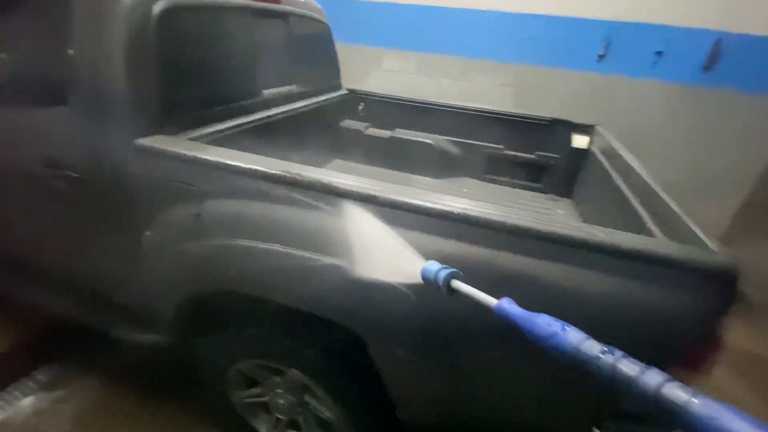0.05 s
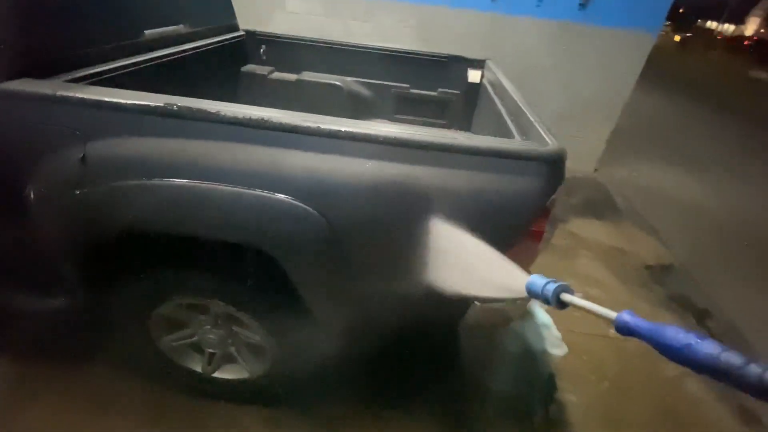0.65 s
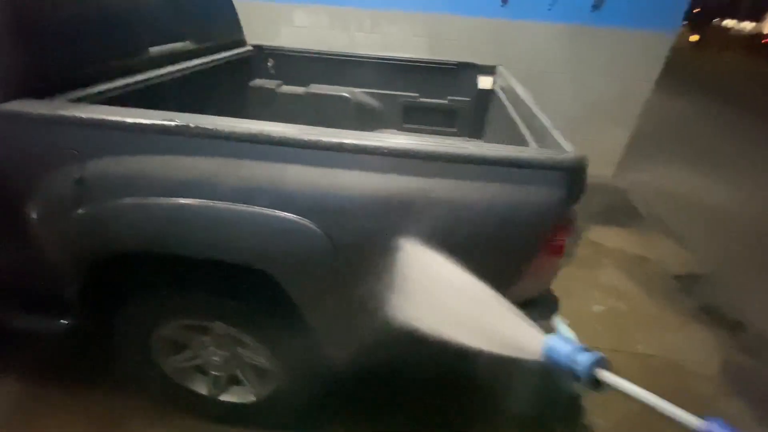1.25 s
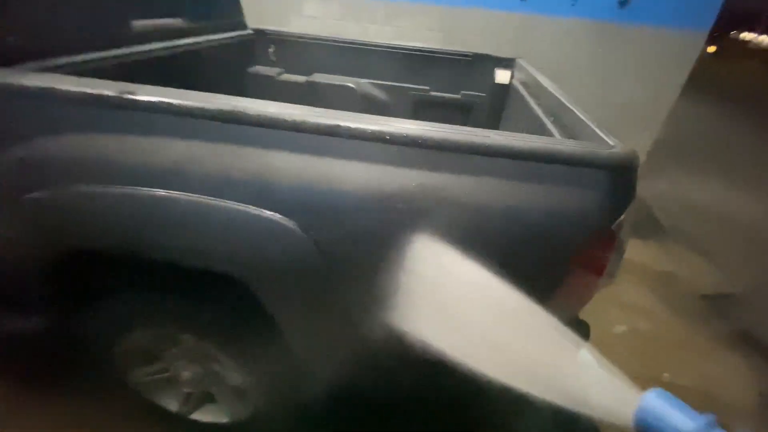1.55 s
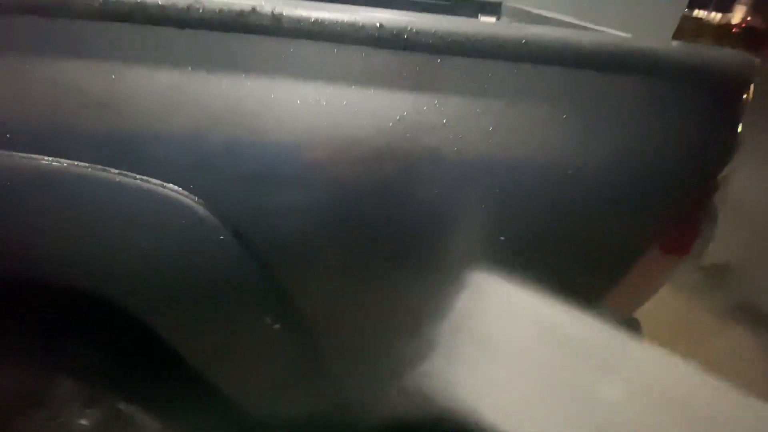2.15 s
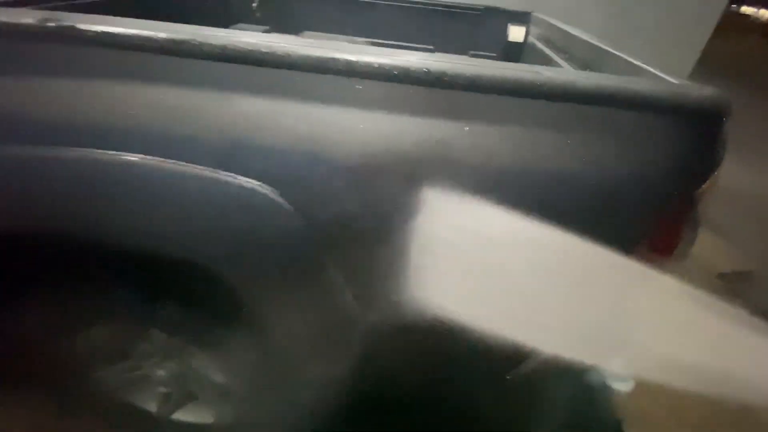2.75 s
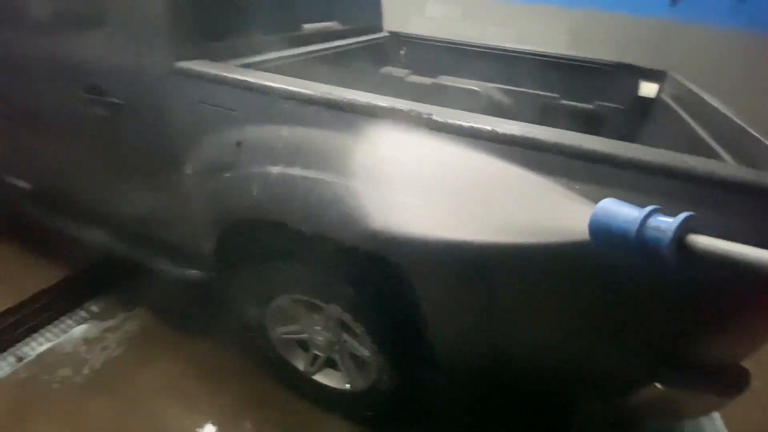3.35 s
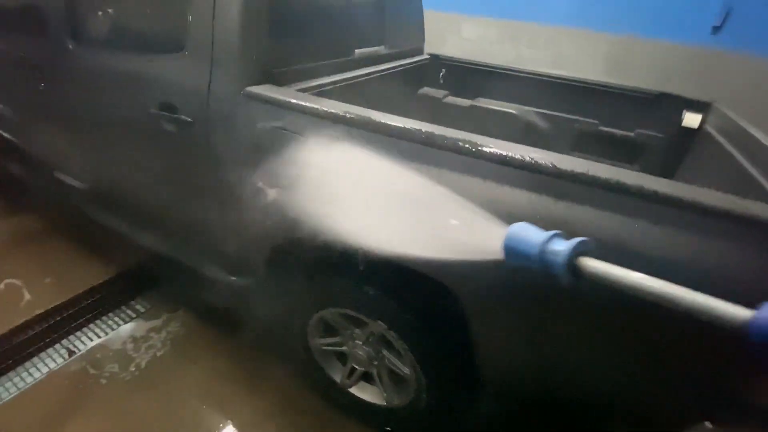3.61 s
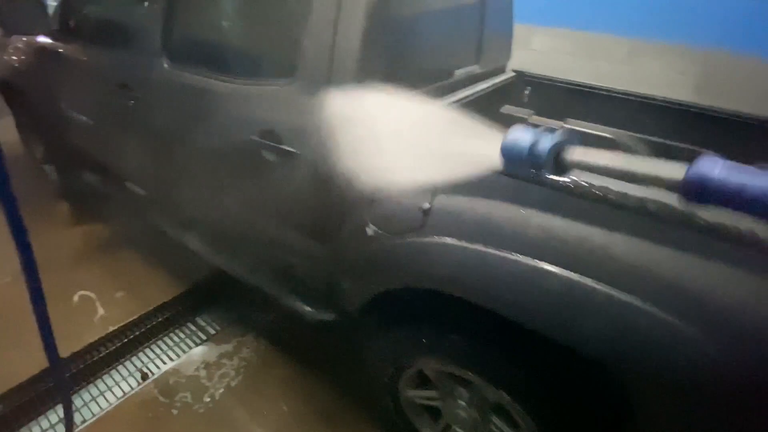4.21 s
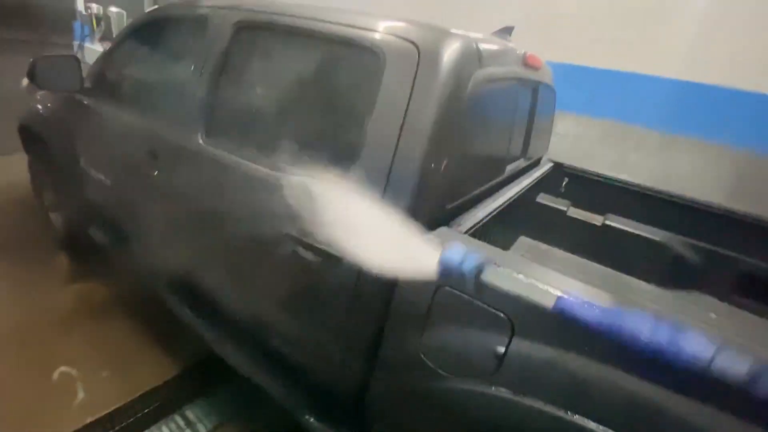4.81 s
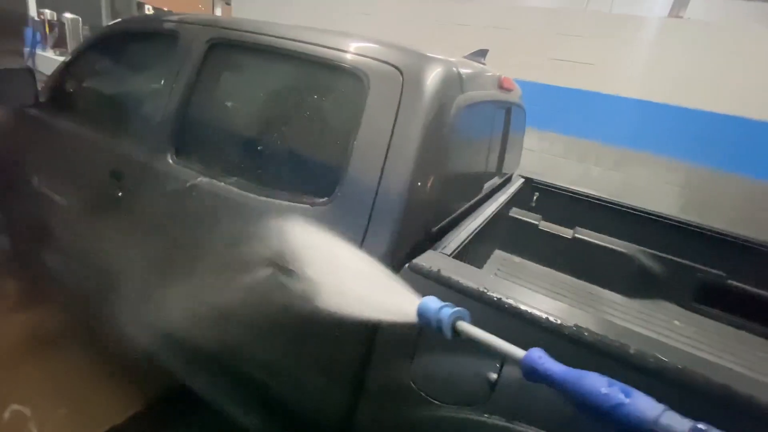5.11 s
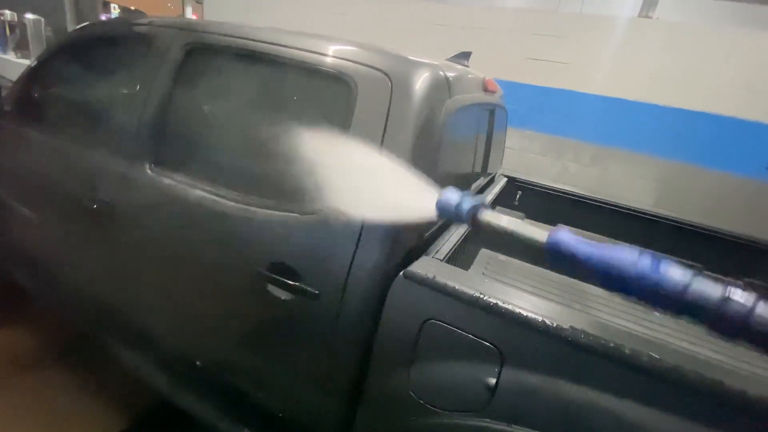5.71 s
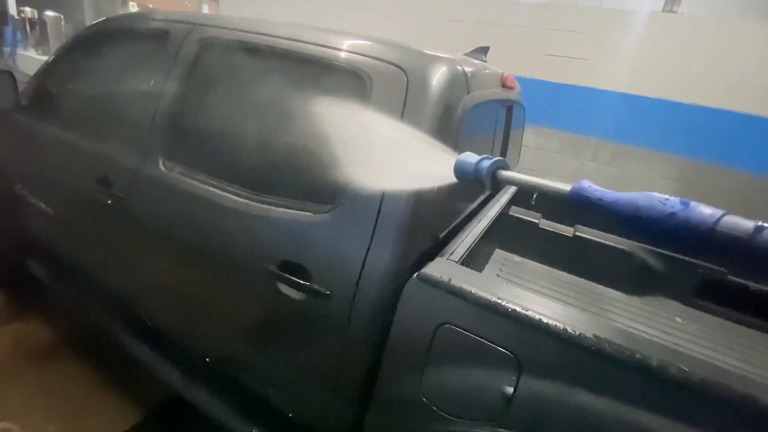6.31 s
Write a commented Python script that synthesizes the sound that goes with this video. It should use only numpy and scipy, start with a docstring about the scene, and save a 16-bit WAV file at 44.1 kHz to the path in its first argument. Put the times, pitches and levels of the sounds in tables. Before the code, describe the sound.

A pressure washer sprays a pickup truck with a loud, steady, whistling hiss, passing close by and then easing off a little.

```python
"""In a car wash bay, a pressure washer's fan jet sweeps along the side of a pickup truck.
Countless drops merge into noise: the water roars on the paint, the jet hisses and fine mist fizzes.
The flow excites one broad resonance in the nozzle and drives the body panels into drumming.
The lance passes close by, dragging air with it, then reaches out towards the cab.
Reflections from the truck and the bay comb-filter the spray."""
import sys
import numpy as np
from scipy import signal
from scipy.fft import rfft, irfft, next_fast_len
from scipy.io import wavfile
from scipy.ndimage import uniform_filter1d, map_coordinates

SR = 44100
rng = np.random.default_rng(int(sys.argv[2]) if len(sys.argv) > 2 else 0)


def inscribe(sig):
    """Save sig as 16-bit PCM at rate SR to the path in sys.argv[1].

    A 1-D sig is mono; a 2-D sig holds one channel per row.
    Samples are clipped to [-1, 1] before scaling.
    """
    pcm = np.round(np.clip(np.atleast_2d(sig).T, -1, 1) * 32767)
    wavfile.write(sys.argv[1], SR, pcm.astype(np.int16))


N = 284928
TIME = np.arange(N) / SR
SIZE = next_fast_len(N, real=True)
FREQ = np.maximum(np.fft.rfftfreq(SIZE, 1 / SR), 1)


def from_db(db):
    """Amplitude ratio of a level in decibels."""
    return 10 ** (np.asarray(db) / 20)


def in_time(rows):
    """Linear interpolation of each column over time."""
    times, *columns = np.transpose(rows)
    return [np.interp(TIME, times, column) for column in columns]


def over_hz(points):
    """Linear interpolation over log frequency."""
    hz, value = np.transpose(points)
    return np.interp(np.log(FREQ), np.log(hz), value)


def resonance(hz, width_hz):
    """Magnitude response of a damped oscillator, peak 1."""
    return 1 / np.hypot(1, (FREQ ** 2 - hz ** 2) / (FREQ * width_hz))


def delayed(x, ms):
    """Time-varying delay of one channel."""
    return map_coordinates(x, [(TIME - ms / 1000) * SR], order=3, mode="mirror")


def wander(rate_hz):
    """Low-pass random fluctuation of unit variance."""
    slow = irfft(rfft(rng.standard_normal(SIZE)) / (1 + (FREQ / rate_hz) ** 2), SIZE)[:N]
    return (slow - slow.mean()) / slow.std()


def swell(at_s, half_s):
    """Gaussian envelope, peak 1."""
    return np.exp(-((TIME - at_s) / half_s) ** 2 / 2)


def closeness(lead_s=0, pass_s=2.316, half_s=0.68):
    """Inverse-square law for the passing nozzle, 1 at its nearest."""
    return 1 / (1 + ((TIME + lead_s - pass_s) / half_s) ** 2)


def following(level_db, share):
    """Power-law gain: a share of a level's swing about its mean."""
    return from_db(share * (level_db - level_db.mean()))


# Narrow peaks and notches that colour the treble hiss: (frequency [Hz], width [Hz], gain [dB])
TREBLE_COLOUR = [(5030, 260, 1.5), (5630, 290, 2), (5720, 115, 7.5), (6200, 165, -4), (6380, 160, 5.5),
                 (6820, 270, 6.2), (7640, 190, -7)]
# Level difference: (frequency [Hz], left minus right [dB])
STEREO_BALANCE = [(70, -11), (150, -13.5), (215, -19.5), (330, -8), (430, -8), (540, -5.5), (640, 1.5),
                  (720, 4), (850, -4.5), (1200, -1.5), (1700, -3.5), (2250, -5), (2800, -3), (3600, -1),
                  (5000, -2), (6500, -4), (8800, -4), (10500, -0.5)]
# Likeness of left and right, nearly the same in the top treble: (frequency [Hz], coherence [0-1])
STEREO_COHERENCE = [(60, 0.9), (150, 0.92), (215, 0.44), (350, 0.67), (600, 0.94), (770, 0.76), (950, 0.82),
                    (1200, 0.6), (2200, 0.97), (3000, 0.56), (5200, 0.47), (6700, 0.96), (8700, 0.047),
                    (10500, 0.74), (15000, 1)]
# Phase difference; a few treble bands sound wide and hollow: (frequency [Hz], lead of left [rad])
STEREO_PHASE = [(50, 4.9), (160, 4.7), (260, 3.2), (400, 2.6), (620, 2.5), (780, 1), (950, 1.15),
                (1300, .6), (1750, -.4), (2300, -.25), (3000, -.8), (5300, -.8), (5520, -2.8), (5850, -1.8),
                (6350, 0), (7400, 0), (7700, 2.2), (8000, 0), (12100, 0), (12700, -2.9), (14200, -3.4),
                (14700, -6.3)]
def stereo_image():
    """Interchannel coherence and the complex gains of left and right at each frequency."""
    balance = from_db(over_hz(STEREO_BALANCE))
    colour_db = sum(db * np.exp(-((FREQ - hz) / width) ** 2) for hz, width, db in TREBLE_COLOUR)
    right = from_db(colour_db) / np.hypot(1, balance)
    left = right * balance * np.exp(1j * over_hz(STEREO_PHASE))
    return np.clip(over_hz(STEREO_COHERENCE), 0, 1), np.array([left, right])


def turbulence(colour, image):
    """Superposition: countless drops sum to Gaussian noise, partly coherent between channels; rms 1."""
    coherence, gains = image
    noise = rfft(rng.standard_normal((3, SIZE)))
    pair = np.sqrt(coherence) * noise[0] + np.sqrt(1 - coherence) * noise[1:]
    coloured = irfft(pair * gains * colour, SIZE)[:, :N]
    return coloured / coloured.std()


def band_swells(rows, image):
    """Resonant filtering: each row is a noise band that swells and fades."""
    return sum(from_db(db) * swell(at_s, half_s) * turbulence(resonance(hz, width_hz) ** 2, image)
               for at_s, half_s, hz, width_hz, db in rows)


# Spectrum of water striking paint: (frequency [Hz], relative level [dB])
ROAR_SPECTRUM = [(150, -17), (300, -14), (410, -1.5), (490, -4.5), (580, -1.5), (660, -1), (735, 3),
                 (850, -0.5), (1100, -1), (1500, 0.5), (1900, 1.5), (2600, -9.5), (5000, -53)]
def paint_roar(impact_db, image, corner_loss_db=4):
    """Impact noise of water on paint, weaker on the stiff rear corner during the pass."""
    gain = from_db(impact_db + 1.08 - corner_loss_db * closeness() ** 6)
    return gain * turbulence(from_db(over_hz(ROAR_SPECTRUM)), image)


# Spectrum of the fan of water: (frequency [Hz], relative level [dB])
HISS_SPECTRUM = [(1200, -57), (2200, 6.5), (2900, 1), (3600, 2.5), (5000, 3), (6000, -21), (8000, -35)]
def jet_hiss(hiss_db, image, spatter_db=0.5):
    """Jet noise, amplitude-modulated as the fan breaks up."""
    gain = from_db(hiss_db - 0.5 + spatter_db * wander(rate_hz=18))
    return gain * turbulence(from_db(over_hz(HISS_SPECTRUM)), image)


def steadied(x, hold_s):
    """Envelope normalisation evens out the noise's slow random swells, so its loudness stays steady."""
    size = int(hold_s * SR)
    power = (x ** 2).mean(0)
    return x / np.sqrt(uniform_filter1d(uniform_filter1d(power, size), size))


# Wavering centre pitch of the whistling band near 2.2 kHz: (time [s], frequency [Hz])
SONG_PITCH = [(0, 2318), (.33, 2168), (.5, 2251), (.97, 2160), (1.2, 2229), (1.37, 2170), (1.8, 2243),
              (2.35, 2295), (2.9, 2238), (3.5, 2207), (3.95, 2251), (4.38, 2149), (4.54, 2261),
              (4.69, 2170), (4.85, 2256), (5.43, 2293), (5.92, 2192), (6.46, 2250)]
# Its swells and dips: (time [s], half length [s], gain [dB], added power share of the core [0-1])
SONG_SURGES = [(.13, .08, 0.7, .55), (0.245, 0.015, 3.5, .3), (0.33, 0.02, -3, 0), (.5, 0.045, -0.5, .3),
               (0.9, 0.016, -4, 0), (1.026, 0.015, -3, 0), (1.246, 0.025, 1, .3), (1.411, 0.021, -1.5, 0),
               (1.506, 0.019, 3.5, 0.36), (1.62, .03, 2, 0.19), (1.77, 0.017, 4.5, .35),
               (1.84, .015, -2.5, 0), (2.142, .02, -7, 0), (2.21, .025, 2, .45), (2.273, .018, -10, 0),
               (2.33, 0.018, -1, 0.34), (2.411, 0.02, -5, 0), (2.475, .02, 5, 0.23),
               (2.848, .16, 1.5, 0.038), (3.064, .025, 2, 0), (3.152, 0.023, -2, 0), (3.405, .02, -2.5, 0),
               (3.3, 0.036, .5, 0.26), (3.74, .028, 2, 0.49), (4.162, .022, -3, 0), (4.265, .022, 1, 0),
               (4.597, .06, .5, 0), (4.889, .018, -2, 0), (4.945, 0.024, 2.5, 0.18),
               (5.042, 0.025, -4, 0.058), (5.19, .035, 1, 0), (5.676, 0.021, 0.5, .3), (5.863, .03, 0.5, 0)]
def nozzle_song(impact_db, image, level_db=-18.5, core_share=0.39, flutter_db=0.92):
    """Flow-excited resonance: one fluttering band, now tight, now broad, whose centre drifts."""
    song_hz, = in_time(SONG_PITCH)
    mean_hz = song_hz.mean()
    broad = turbulence(resonance(mean_hz, width_hz=510) * resonance(mean_hz, width_hz=1370), image)
    core = turbulence(resonance(mean_hz, width_hz=200) * resonance(mean_hz, width_hz=510), image)
    surge_db = sum(db * swell(at_s, half_s) for at_s, half_s, db, _ in SONG_SURGES)
    added_share = sum(share * swell(at_s, half_s) for at_s, half_s, _, share in SONG_SURGES)
    focus = np.clip(core_share + added_share, 0, 1)
    song = steadied(np.sqrt(focus) * core + np.sqrt(1 - focus) * broad, hold_s=0.058)
    behind_ms = 1000 * np.cumsum(1 - song_hz / mean_hz) / SR  # a changing delay bends the pitch
    swaying = np.array([delayed(side, behind_ms) for side in song])
    aside_db = 1.5 * closeness() ** 4  # weaker while beside the microphone
    gain = from_db(level_db + surge_db - aside_db + flutter_db * wander(rate_hz=19))
    return gain * following(impact_db, share=0.84) * swaying


# Spectrum of the finest drops: (frequency [Hz], relative level [dB])
MIST_SPECTRUM = [(3500, -7.5), (5200, -9.5), (6300, 3), (8800, 2), (9600, -4.5), (10600, 0.5), (11500, 0),
                 (12400, -7.5), (14200, -8.5), (15000, -9)]
def mist(hiss_db, image, fizz_db=-22.5, gust_db=0.5, far_db=-42.5, near_db=-25):
    """Atomisation: the shattered jet fizzes in light gusts and sizzles most just before the pass."""
    fizz_gain = from_db(fizz_db + gust_db * wander(rate_hz=4)) * following(hiss_db, share=0.68)
    fizz = fizz_gain * turbulence(from_db(over_hz(MIST_SPECTRUM)), image)
    sizzle_gain = from_db(far_db) + from_db(near_db) * closeness(lead_s=0.38) ** 1.1
    return fizz + sizzle_gain * turbulence(resonance(10200, width_hz=4300) ** 3, image)


# Spectrum of the body panels: (frequency [Hz], relative level [dB])
DRUM_SPECTRUM = [(20, -32), (30, -32), (40, -2), (55, -1.5), (78, 2.5), (98, -3), (130, 2), (180, -2),
                 (250, -2), (400, -6.5), (700, -22.5), (1500, -70)]
def panel_drumming(impact_db, image, level_db=-27, corner_loss_db=7.5):
    """Forced vibration: the jet's uneven push shakes the wide panels, the stiff corner less."""
    gain = from_db(level_db - corner_loss_db * closeness() ** 3) * following(impact_db, share=0.84)
    return gain * turbulence(from_db(over_hz(DRUM_SPECTRUM)), image)


# Low swelling bands: (time [s], half length [s], frequency [Hz], width [Hz], level [dB])
LOW_SWELLS = [(.05, 0.045, 645, 56, -28.5), (0.39, 0.59, 730, 260, -30.5), (0.85, 0.24, 222, 59, -31.5),
              (.95, 0.13, 170, 45, -33), (1.3, .2, 610, 160, -31), (1.7, .5, 732, 25, -33),
              (1.655, 0.083, 417, 43, -21.5), (1.69, 0.31, 135, 42, -27), (2.6, 0.95, 74, 69, -35),
              (2.39, 0.14, 149, 124, -27), (3.3, 0.32, 110, 60, -35), (2.954, 0.21, 395, 110, -33),
              (3.92, .45, 594, 180, -32.5), (4.18, .1, 230, 60, -28.5), (5.85, 0.95, 362, 80, -38),
              (5.7, .84, 79, 22, -36.5)]
def low_swells(image):
    """Band-limited noise: low booms, rings and broad swells of low-mid roar."""
    return band_swells(LOW_SWELLS, image)


# Flares of the spray, plus the nozzle's tight whistle near 2.2 kHz during the pass: (time [s], half length [s],
# frequency [Hz], width [Hz], level [dB])
SPRAY_FLARES = [(1.11, 0.068, 1810, 500, -25), (1.45, .12, 1760, 550, -29), (2.1, 0.17, 1680, 350, -27),
                (2.15, 0.19, 2230, 130, -25), (2.62, .08, 1250, 600, -27.5), (2.06, 0.12, 8750, 900, -25),
                (2.3, .11, 4400, 1200, -25), (2.7, .17, 8460, 700, -29), (2.92, 0.11, 6630, 700, -28),
                (3.03, 0.3, 1840, 660, -25.5), (4.27, 0.12, 1980, 600, -29), (4.7, 0.072, 1700, 550, -27),
                (6.1, .25, 3800, 1300, -37), (6.15, .3, 1780, 500, -33.5)]
def spray_flares(image):
    """Angle of incidence: most bands flare as the fan meets the paint at a new angle; the narrow one near 2.2
    kHz is the nozzle whistling tight as it passes."""
    return band_swells(SPRAY_FLARES, image)


# Spectrum of buffeting air: (frequency [Hz], relative level [dB])
DRAUGHT_SPECTRUM = [(25, -25), (45, -6), (90, 5), (150, 0), (230, 3), (400, -4), (650, 1), (900, -3),
                    (1200, -5), (2000, -24), (4000, -50)]
def draught(level_db=-22):
    """Entrainment: air dragged along by the passing jet buffets two microphones in opposite phase."""
    buffet = irfft(rfft(rng.standard_normal(SIZE)) * from_db(over_hz(DRAUGHT_SPECTRUM)), SIZE)[:N]
    return from_db(level_db) * closeness() ** 2.1 * np.array([buffet, -buffet]) / buffet.std()


# Paths off the truck: (time [s], delay via its side [ms], delay via a farther surface [ms])
TRUCK_PATHS = [(0, 0.92, 1.8), (.24, 0.84, 1.7), (.65, 0.85, 2.36), (.98, 0.88, 2.7), (1.3, 1.36, 2.76),
               (1.7, 2.1, 2.23), (2.25, 1.78, 2.3), (2.95, 2, 2.5), (3.4, 1.73, 3), (3.7, 1.46, 2.8),
               (4.2, 1.21, 3), (4.48, 1.45, 2.85), (4.68, 1.33, 2.94), (4.9, 0.97, 2.55), (5.3, 0.86, 2.5),
               (5.65, 0.89, 2.5), (5.85, 1.14, 3.1), (6.46, 1.08, 2.3)]
def truck_echoes(x, dull_hz=3320):
    """Comb filtering: two dull, moving reflections interfere with the direct sound."""
    dull = signal.sosfilt(signal.butter(1, dull_hz, fs=SR, output="sos"), x)
    near_ms, far_ms = in_time(TRUCK_PATHS)
    near = from_db(-13.5) / near_ms ** 0.91  # weakens as its path grows
    far = from_db(-18.5)
    echoes = np.array([near * delayed(side, near_ms) + far * delayed(side, far_ms) for side in dull])
    return (x + echoes) / np.sqrt(1 + near ** 2 + far ** 2)


def panned(x, rest_lag_ms=0.1, swing_ms=0.25, db_per_ms=8.5):
    """Time and level differences: the nearer side hears the passing jet sooner and louder."""
    lag_ms = rest_lag_ms - swing_ms * closeness()
    lean = from_db(db_per_ms * lag_ms / 2)
    return np.array([x[0] * lean, delayed(x[1], lag_ms) / lean])


# Echoes off the wet floor, walls and roof: (delay [ms], level [dB])
BAY_REFLECTIONS = [(5.3, -19.5), (8.9, -22), (13.7, -25), (19.1, -23), (26.3, -19.5), (37.9, -20)]
def bay_echoes(x, stretch=0.404):
    """Early reflections, whose paths stretch and shrink as the lance moves; power is conserved."""
    shift_ms = stretch * in_time(TRUCK_PATHS)[0]
    total, power = x.copy(), 1
    for k, (ms, db) in enumerate(BAY_REFLECTIONS):
        total += from_db(db) * np.array([delayed(side, ms + (-1) ** k * shift_ms) for side in x])
        power += from_db(db) ** 2
    return total / np.sqrt(power)


# The sweep along the truck: (time [s], impact level [dB], hiss level [dB])
SWEEP_LEVELS = [(0, -21, -18), (0.4, -20, -20), (0.75, -22, -21), (1.25, -21.5, -21), (1.67, -19, -17.5),
                (2.1, -19, -17), (2.4, -19, -14.5), (2.7, -22.5, -18), (3.25, -24, -20.5),
                (3.85, -25, -24.5), (4.2, -24, -23), (4.5, -26.5, -26), (4.72, -25.5, -24.5),
                (4.95, -27.5, -29), (5.9, -27, -27), (6.46, -26, -25.5)]
def scene():
    """Superposition of the echoing spray, the vibrating panels, the low swells and the draught."""
    impact_db, hiss_db = in_time(SWEEP_LEVELS)
    image = stereo_image()
    jet = paint_roar(impact_db, image) + jet_hiss(hiss_db, image) + nozzle_song(impact_db, image)
    water = truck_echoes(jet + spray_flares(image))
    spray = panned(water) + mist(hiss_db, image)
    return bay_echoes(spray) + panel_drumming(impact_db, image) + low_swells(image) + draught()


def record(dry, ceiling=1.1, cutoff_hz=15800):
    """Soft saturation rounds the highest peaks; a low-pass filter cuts the top."""
    rounded = dry / (1 + (dry / ceiling) ** 8) ** (1 / 8)
    return signal.sosfilt(signal.ellip(12, .1, 70, cutoff_hz, fs=SR, output="sos"), rounded)


dry = scene()
out = record(dry)
inscribe(out)
```